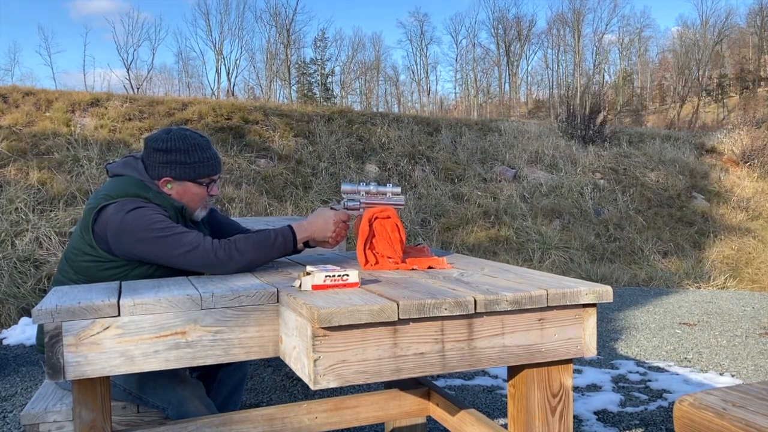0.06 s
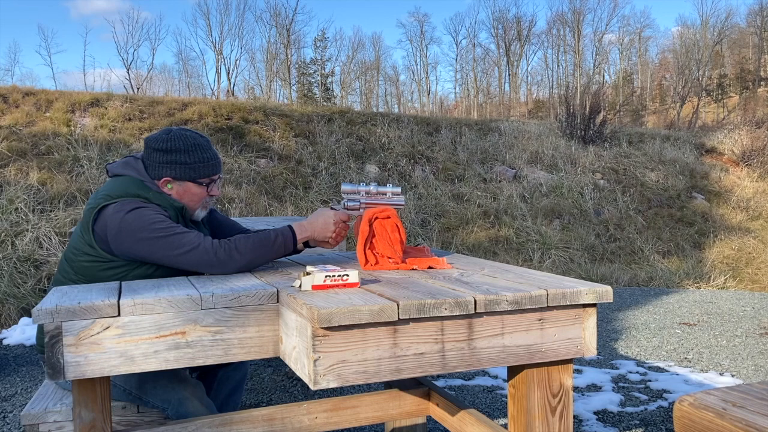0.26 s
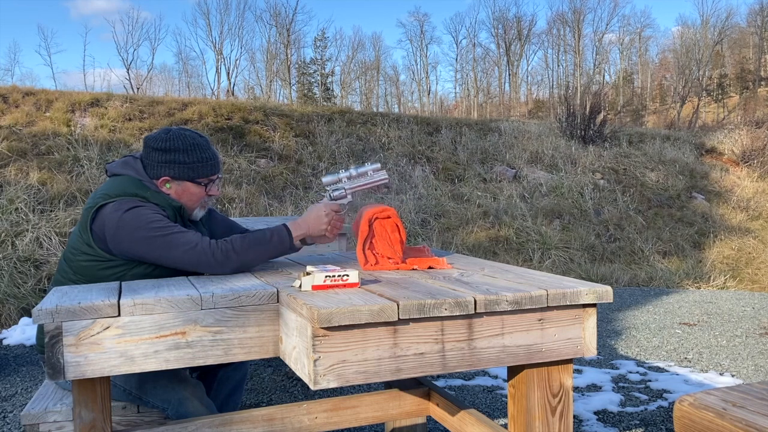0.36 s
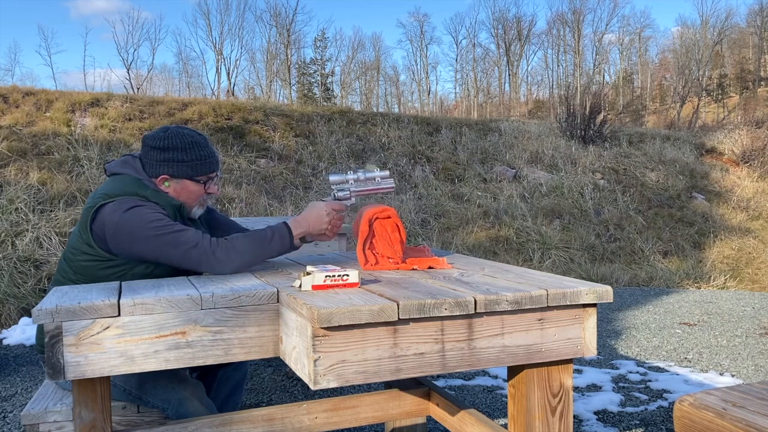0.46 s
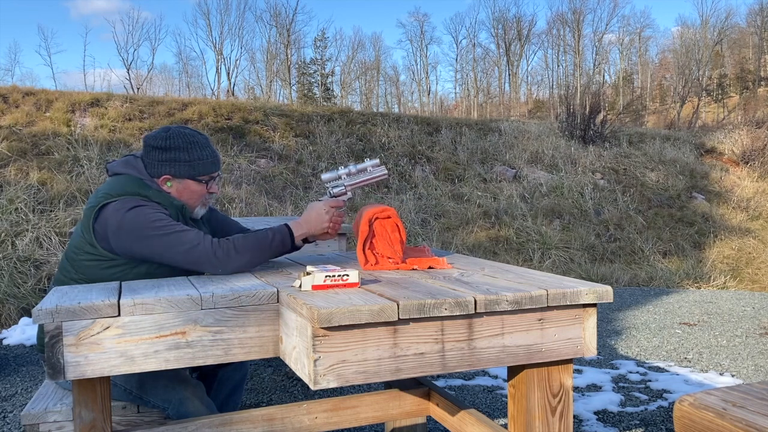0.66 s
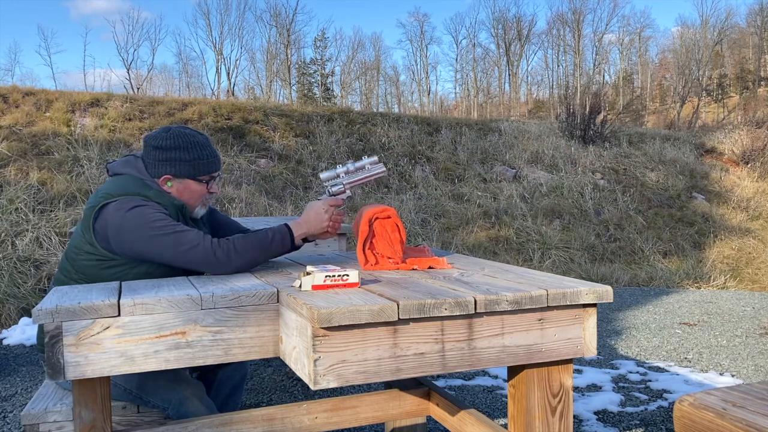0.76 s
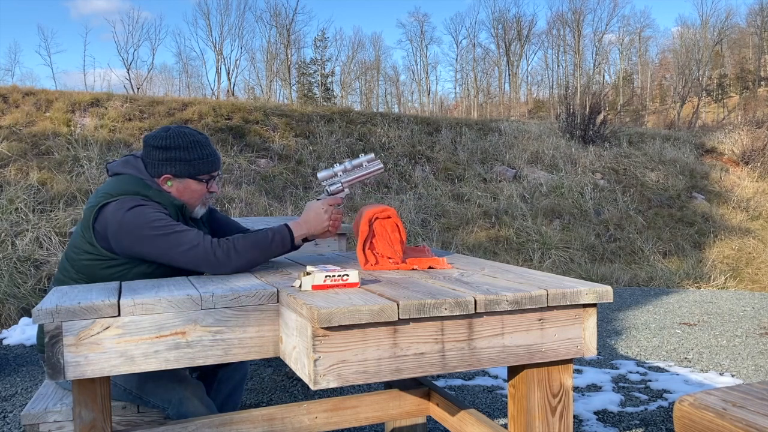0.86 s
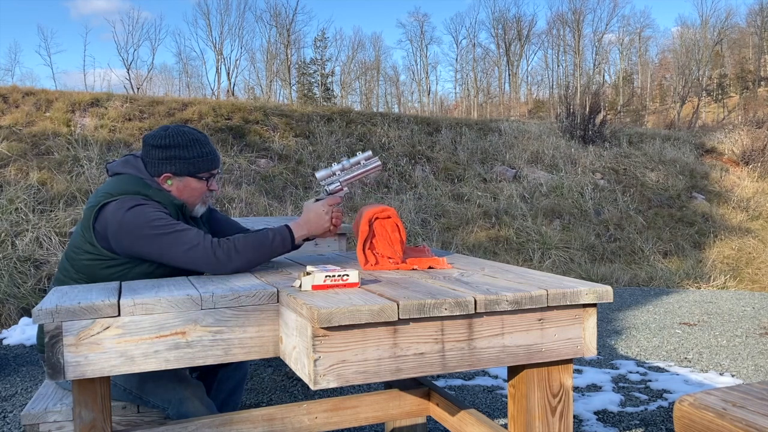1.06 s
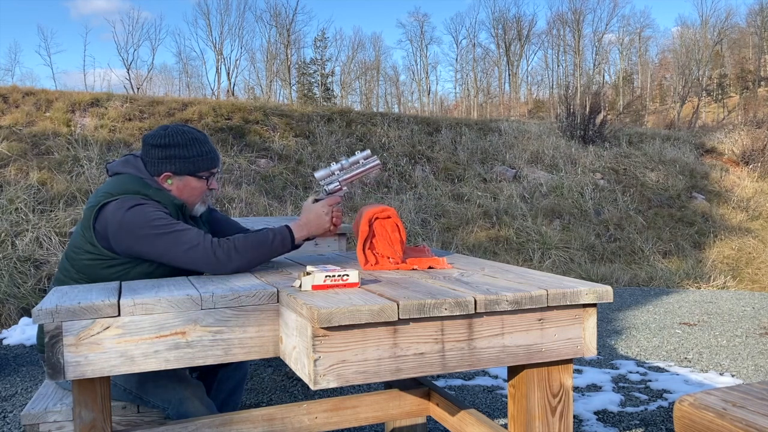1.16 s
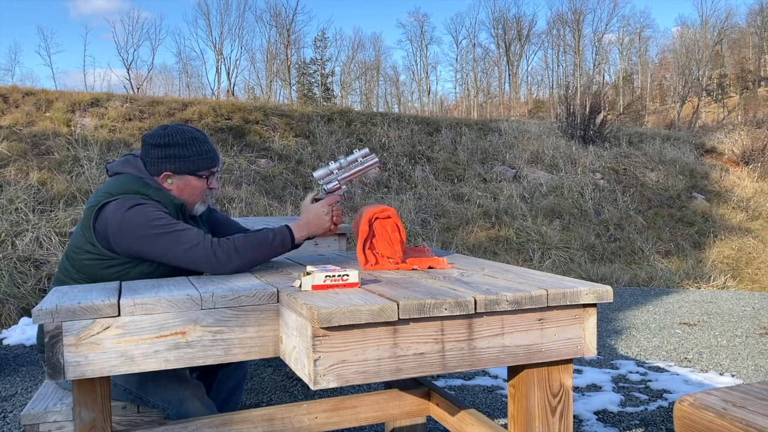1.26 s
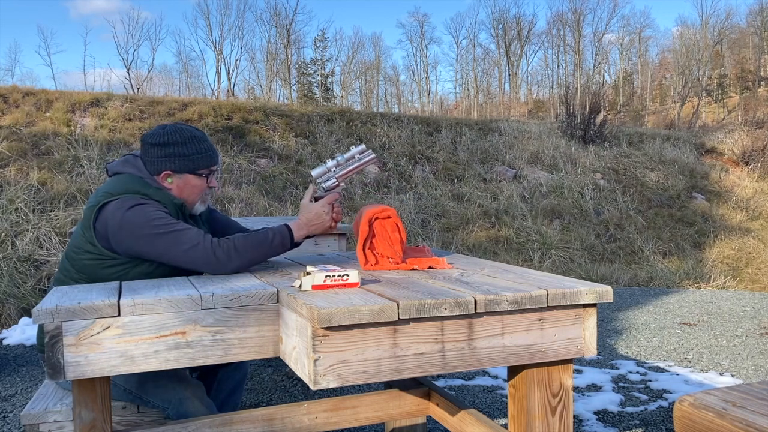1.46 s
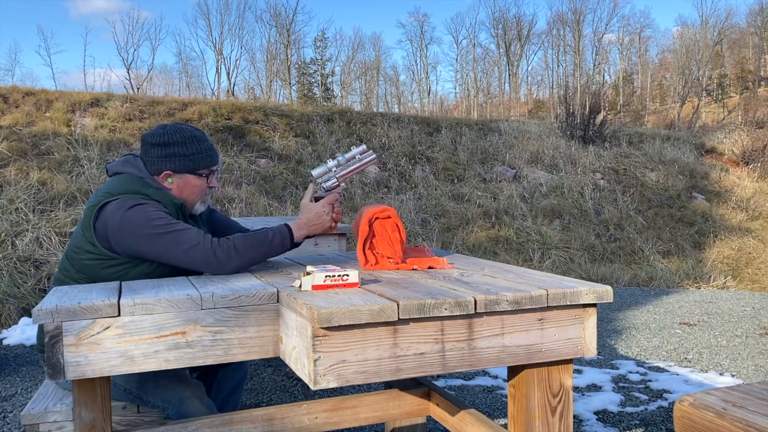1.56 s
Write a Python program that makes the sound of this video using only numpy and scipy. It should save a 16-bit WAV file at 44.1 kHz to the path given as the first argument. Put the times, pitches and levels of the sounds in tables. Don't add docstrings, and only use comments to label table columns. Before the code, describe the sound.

A single heavy revolver shot cracks outdoors, overloading the microphone, then slapping echoes roll away.

```python
import sys
import numpy as np
from scipy import signal
from scipy.fft import rfft, irfft, next_fast_len
from scipy.io import wavfile
from scipy.ndimage import uniform_filter1d, map_coordinates

SR = 44100
rng = np.random.default_rng(int(sys.argv[2]) if len(sys.argv) > 2 else 0)


def waveform_to_disk(signal):
    frames = np.transpose(np.atleast_2d(signal))
    scaled = np.clip(frames, -1, 1) * 32767
    samples = np.round(scaled).astype(np.int16)
    wavfile.write(sys.argv[1], SR, samples)


def voltage_ratio(decibels):
    exponent = np.asarray(decibels, float) / 20
    return 10 ** exponent


N = 70560

# (frequency [Hz], level per Hz [dB])
NEAR_COLOUR = [(59, -55), (100, -21), (271, -26), (1480, -28), (2580, -22), (2860, -20), (7770, -13),
               (16000, -32)]
# (time [s], peak level [dB], centre [Hz], spread [s], edge level [dB])
SLAPS = [(.2865, -22, 1090, 0.0013, -28), (0.329, -14.5, 850, .0012, -5), (.334, -22.5, 970, 0.0041, 4),
         (0.364, -31.5, 1268, 0.0019, -1), (.402, -37, 8000, 0.0013, 3), (0.5245, -5, 1610, 0.00062, -10),
         (0.528, -25.5, 1990, 0.007, -1), (0.552, -21.5, 1760, 0.0067, -30),
         (0.5253, -19.5, 4350, 0.0017, -6), (0.634, -21.5, 1700, 0.0026, -32),
         (0.751, -26, 980, 0.0026, 3.5), (0.766, -15, 1460, 0.0055, -10), (0.83, -28, 1700, 0.0017, -10),
         (0.873, -25, 1480, 0.0014, -22), (0.905, -21.5, 1210, 0.0055, -12),
         (0.9664, -19.5, 1290, 0.0017, -6.5), (1.002, -26.5, 1470, 0.0056, -7.5),
         (1.041, -21, 1000, 0.00084, -8.5), (1.084, -26, 1180, 0.0022, -7), (1.1713, -23, 1380, .001, -8.5),
         (1.226, -34, 1310, 0.0044, -8), (1.284, -29, 870, 0.0018, -6), (1.337, -20, 1520, 0.0033, -18),
         (1.388, -28, 2330, 0.0014, -5.5)]
# (time [s], peak level [dB], pitch [Hz], spread [s])
THUDS = [
    (0.32, -23.5, 281, 0.0053),
    (0.329, -7.5, 283, 0.0038),
    (0.388, -21, 314, 0.0034),
    (0.447, -34, 256, 0.007),
    (0.577, -26, 417, 0.0043),
    (0.655, -26, 408, 0.0037),
    (0.753, -24, 277, 0.0031),
    (0.774, -25, 252, 0.003),
    (0.871, -33, 290, 0.0033),
    (1.004, -30, 334, 0.0019),
]
# (time [s], hills level [dB], low ground swell level [dB])
WASH_LEVEL = [
    (.27, -39, -47),
    (.37, -31.5, -34),
    (.435, -40, -42),
    (0.511, -34, -41),
    (.6, -35.5, -42.5),
    (.72, -42.5, -42),
    (0.798, -37.5, -47.5),
    (1.04, -37, -46.5),
    (1.6, -40.5, -52.5),
]
# (frequency [Hz], level per Hz [dB])
HILLS_EARLY = [(290, -40), (500, -9), (1050, 1), (1360, -3.5), (1510, 2), (2850, -5.5), (7210, -19.5),
               (16000, -39.5)]
# (frequency [Hz], level per Hz [dB])
HILLS_LATE = [(180, -40), (320, -13), (700, -3.5), (1300, -5.5), (2500, -15.5), (4000, -27), (7000, -52),
              (16000, -69)]
# (frequency [Hz], level per Hz [dB])
GROUND_COLOUR = [(24, -69), (40, -48), (81, -23), (148, -11.5), (262, 0), (428, -3.5), (700, -13),
                 (910, -42), (1540, -120)]
# (frequency [Hz], level per Hz [dB])
HISS_COLOUR = [(2060, -11), (3500, 8.5), (3920, 3), (4660, 11.5), (5500, 5.5), (6400, 9), (9560, 4),
               (11100, -1.5), (16000, 0.5)]
# (centre [Hz], width [Hz], lift [dB])
HISS_HUMPS = [
    (6650, 590, 6),
    (11200, 550, 6),
]
# (frequency [Hz], level per Hz [dB])
AIR_COLOUR = [(18, -43), (30, -8.5), (115, -3), (184, -4.5), (404, -7.5), (526, -14.5), (913, -15.5),
              (7870, -27), (16000, -31)]

SHOT_S, LEAD_S, HAMMER_S, HAMMER_DB = 0.2326, 0.0012, 0.2222, -39
PORT_HZ, PORT_S, PORT_DB = 3055, 0.0066, 9.5
BENCH_HZ, BENCH_T60, BENCH_DB, RING_DB = 1400, 0.092, 9.5, -4
BENCH_RATE, LATE_RATE, RATE_FALL_S = 2100, 500, 0.017
SHARP, SPIKY_DB = 2.25, 4
FIZZ_DB, FIZZ_T60, BODY_DB = 0.5, 0.06, -5.5
PUSH_DB, PUSH_S = -12.5, 0.013
RAIL_DB, RAIL_HOLD_S, RAIL_T60 = -3.5, 0.021, 0.15
FIRST_DB, LEAN = 2.5, 0.29
NEAR_DB, NEAR_T60 = -21, 0.082
AIR_LOSS_DB = 84
SLAP_Q, EDGE_HZ, EDGE_Q = 1.58, 3650, 0.95
TURN_S, TURN_LONG_S = 0.43, 0.85
ROLL_DB, ROLL_RATE, PATCHY_DB = 0.8, 110, 1.2
PUFF_S, PUFF_LONG_S, PUFF_DB = 1.17, 0.05, -59
HISS_DB, HISS_FROM_S, HISS_RISE_S = -44.5, 0.58, 0.62
AIR_DB, OFFSET = -54.5, -0.00027
DUCK_DB, DUCK_S = -16.5, 0.49
TOP_HZ, BLAST_TOP_HZ = 15800, 16500


def blast():
    t = clock(SHOT_S)
    after = np.maximum(t, 0)
    early = 1 / (1 + np.exp(np.clip((t - PORT_S) / 0.00014, -50, 50)))
    onset = np.exp(np.minimum(t, 0) / LEAD_S) * np.where(t < 0, 0.3, 1)
    wave = pressure_dips(t, early) + onset * (bench_noise(after, early) + gas_noise(after))
    held = overload(wave, after, early)
    push = voltage_ratio(PUSH_DB) * (1 - np.exp(-after / 0.0005)) * np.exp(-(after / PUSH_S) ** 4)
    return filtered(held + push + near_surfaces(t) + hammer(), lambda f: edge(f, BLAST_TOP_HZ))


def pressure_dips(t, early):
    after = np.maximum(t, 0)
    thinning = np.exp(-(after / RATE_FALL_S) ** 2)
    slow = (LATE_RATE + (BENCH_RATE - LATE_RATE) * thinning) * voltage_ratio(3.2 * wobble(1100))
    rate = early * PORT_HZ * voltage_ratio(1.8 * wobble(1500)) + (1 - early) * slow
    phase = 2 * np.pi * np.cumsum(rate) / SR
    sharp = 3.3 * early + SHARP * (1 - early) * BENCH_RATE / slow
    shape = 0.36 * early + 0.12 - np.exp(sharp * (np.cos(phase) - 1))
    late_db = BENCH_DB - 60 * after / BENCH_T60 + SPIKY_DB * wobble(800)
    size = voltage_ratio(early * PORT_DB + (1 - early) * late_db)
    return filtered(size * shape * (t > 0), lambda f: peak(f, 1700, 0.13))


def bench_noise(after, early):
    lumps = voltage_ratio(RING_DB - 60 * after / 0.11 + 4.2 * wobble(600))
    return lumps * (1 - 0.62 * early) * noise(lambda f: peak(f, BENCH_HZ, 0.76))


def gas_noise(after):
    fizz_level = voltage_ratio(FIZZ_DB - 60 * after / FIZZ_T60 + 3.1 * wobble(500))
    fizz = fizz_level * noise(lambda f: peak(f, 6000, 0.7))
    body_level = voltage_ratio(BODY_DB - 60 * after / 0.12) * (1 - np.exp(-(after / 0.011) ** 2))
    body = body_level * noise(lambda f: peak(f, 277, 1.3) ** 2)
    return fizz + body


def overload(wave, after, early):
    fall_db = 60 * np.maximum(after - RAIL_HOLD_S, 0) / RAIL_T60
    rail = voltage_ratio(RAIL_DB + FIRST_DB * early - fall_db) * np.where(wave > 0, 1 - LEAN, 1.3)
    return filtered(rail * np.tanh(wave / rail), lambda f: peak(f, 1100, 0.12))


def near_surfaces(t):
    level = voltage_ratio(NEAR_DB - 60 * np.maximum(t, 0) / NEAR_T60) * (t > 0)
    return level * noise(lambda f: voltage_ratio(along(NEAR_COLOUR, f)))


def hammer():
    level = voltage_ratio(HAMMER_DB - 60 * np.abs(clock(HAMMER_S)) / 0.015)
    return level * noise(lambda f: peak(f, 2300, 1.0) ** 2)


def echoes():
    out = np.zeros(N + SR)
    t = np.arange(SR // 5) / SR
    for s, db, hz, spread, edge_db in SLAPS:
        add_at(out, s, voltage_ratio(db) * slap(t, s - SHOT_S, hz, spread, edge_db))
    for s, db, hz, spread in THUDS:
        add_at(out, s, -voltage_ratio(db - 1) * swell(t, spread) * np.sin(2 * np.pi * hz * t))
    return out[:N]


def slap(t, travel_s, hz, spread, edge_db):
    far = lambda f: voltage_ratio(-AIR_LOSS_DB * travel_s * f / 10000)
    main, bright = swell(t, spread) * rng.standard_normal((2, len(t)))
    burst = filtered(main, lambda f: np.sqrt(far(f)) * peak(f, hz, SLAP_Q) ** 2)
    rim = filtered(bright, lambda f: far(f) * peak(f, EDGE_HZ, EDGE_Q) ** 2)
    return burst / np.abs(burst).max() + voltage_ratio(edge_db) * rim / np.abs(rim).max()


def wash():
    t = clock(0)
    s, hills_db, swell_db = np.transpose(WASH_LEVEL)
    share = lambda u: np.clip((u - TURN_S) / TURN_LONG_S, -0.1, 1)
    late = lambda f: np.maximum(along(HILLS_LATE, f), -70)
    colour = lambda f, u: along(HILLS_EARLY, f) * (1 - share(u)) + late(f) * share(u)
    hills = voltage_ratio(np.interp(t, s, hills_db) + ROLL_DB * wobble(ROLL_RATE)) * rush(colour, PATCHY_DB)
    low_level = voltage_ratio(np.interp(t, s, swell_db) + 2.8 * wobble(25.51))
    low = low_level * noise(lambda f: voltage_ratio(along(GROUND_COLOUR, f)))
    return (t > SHOT_S) * (hills + low)


def puff():
    u = clock(PUFF_S) / PUFF_LONG_S
    return voltage_ratio(PUFF_DB) * np.exp(-u * u) * noise(lambda f: peak(f, 40, 1.5) ** 2)


def far_woods():
    lift = lambda f: sum(db * np.exp(-((f - hz) / width) ** 2) for hz, width, db in HISS_HUMPS)
    rise = (1 - np.exp(-np.maximum(clock(HISS_FROM_S), 0) / HISS_RISE_S)) ** 1.38
    level = voltage_ratio(HISS_DB + 1.64 * wobble(8.02)) * rise
    return level * noise(lambda f: voltage_ratio(along(HISS_COLOUR, f) + lift(f)))


def quiet_air():
    t = clock(SHOT_S)
    duck = voltage_ratio(DUCK_DB * np.exp(-t / DUCK_S) * (t > 0))
    air = voltage_ratio(AIR_DB + 0.96 * wobble(54)) * duck * noise(lambda f: voltage_ratio(along(AIR_COLOUR, f)))
    return air + OFFSET * (t < 0)


def clock(start_s):
    return np.arange(N) / SR - start_s


def swell(t, spread):
    return t / spread * np.exp(1 - t / spread)


def add_at(out, s, x):
    out[round(s * SR):][:len(x)] += x


def unit(x):
    return x / np.sqrt(np.mean(x ** 2) + 1e-20)


def along(points, hz):
    f, v = np.transpose(points)
    return np.interp(np.log(hz + 1), np.log(f + 1), v)


def filtered(x, response):
    m = next_fast_len(len(x) + 8192)
    return irfft(rfft(x, m) * response(np.fft.rfftfreq(m, 1 / SR)), m)[:len(x)]


def peak(f, hz, q):
    return 1j * f * hz / q / (hz * hz - f * f + 1j * f * hz / q)


def edge(f, top_hz):
    return np.clip((top_hz - f) / 150, 0, 1) ** 2


def noise(response, size=N):
    return unit(filtered(rng.standard_normal(size), response))


def wobble(rate):
    knots = rng.standard_normal(int(N * rate / SR) + 4)
    return map_coordinates(knots, [np.arange(N) * rate / SR])


def rush(gain_db, patchy_db):
    hz, t, z = signal.stft(rng.standard_normal(N), SR, nperseg=256)
    patches = uniform_filter1d(uniform_filter1d(rng.standard_normal(z.shape), 4, 0), 5, 1)
    z = z * voltage_ratio(gain_db(hz[:, None], t) + patchy_db * unit(patches))
    x = signal.istft(z, SR, nperseg=256)[1][:N]
    return x / np.sqrt(uniform_filter1d(x * x, SR // 4, mode="reflect") + 1e-20)


def scene():
    surroundings = echoes() + wash() + puff() + far_woods() + quiet_air()
    return (blast() + filtered(surroundings, lambda f: edge(f, TOP_HZ)))[None]


def band_limit(x):
    return signal.sosfilt(signal.butter(12, 16410, fs=SR, output="sos"), x)


def record(dry):
    mix = np.clip(dry, -1, 1)
    return band_limit(mix)


dry = scene()
out = record(dry)
waveform_to_disk(out)
```